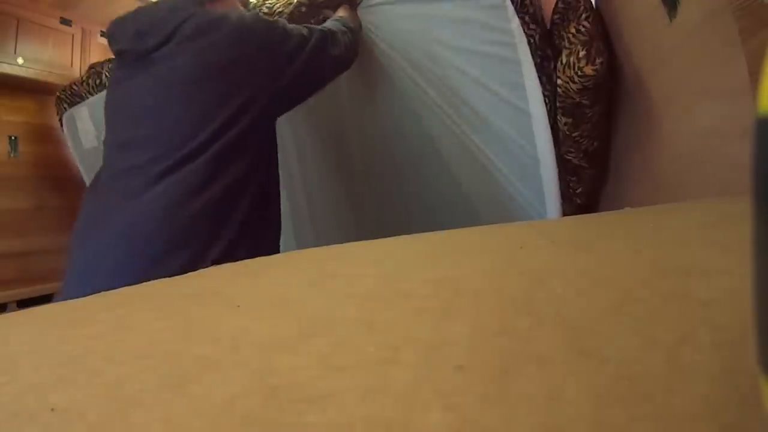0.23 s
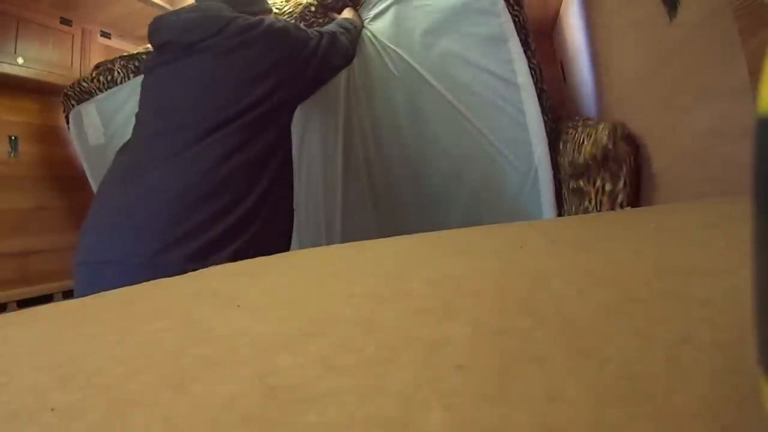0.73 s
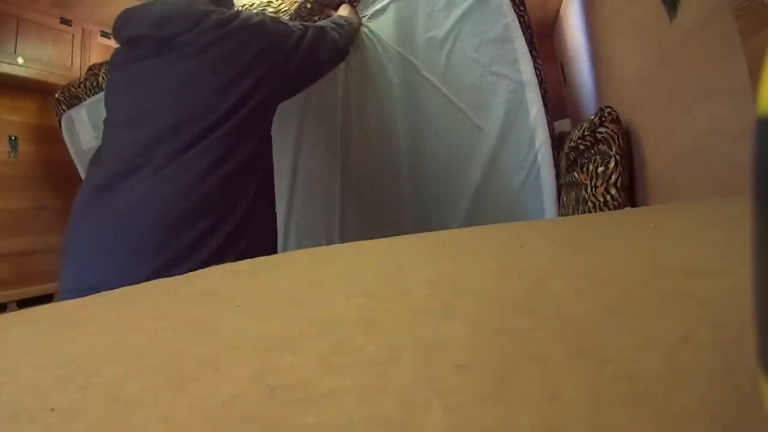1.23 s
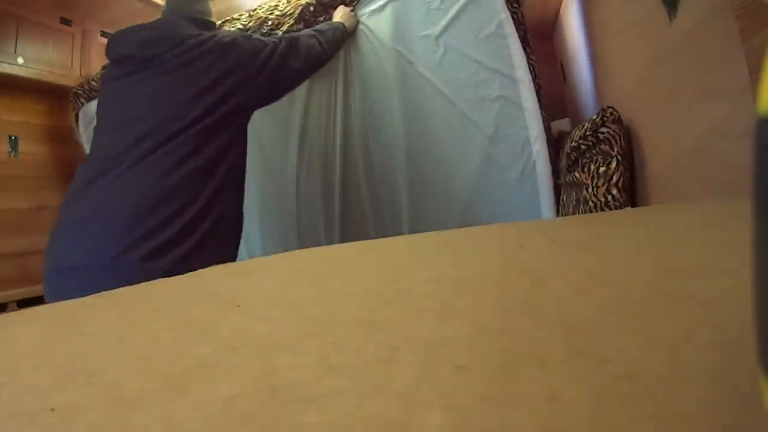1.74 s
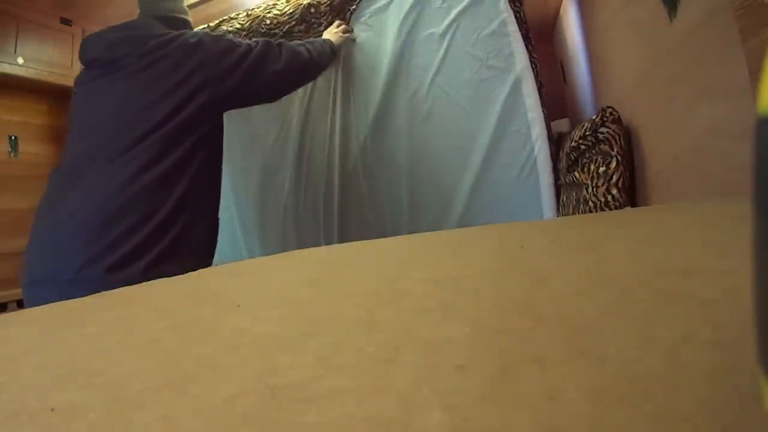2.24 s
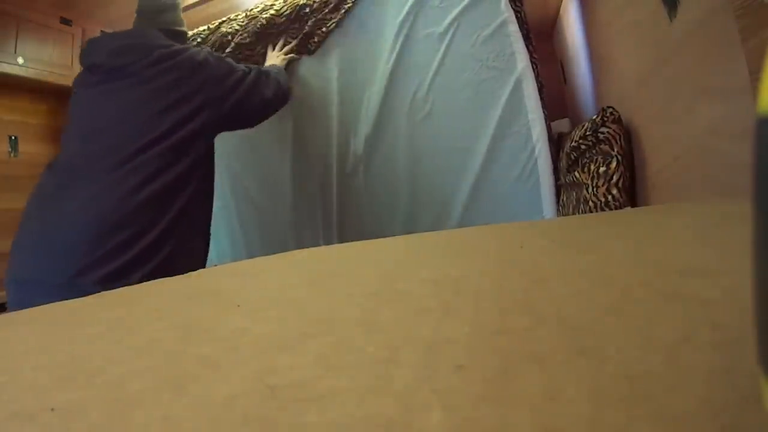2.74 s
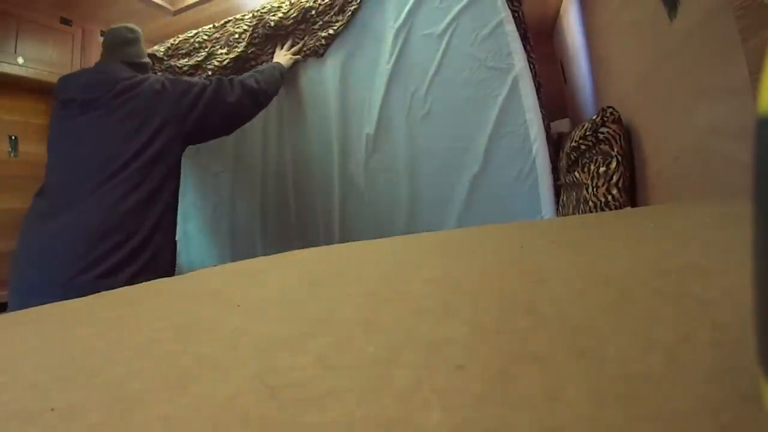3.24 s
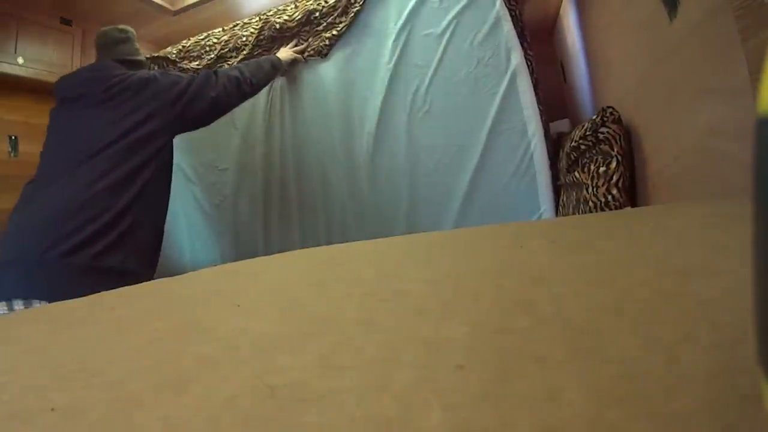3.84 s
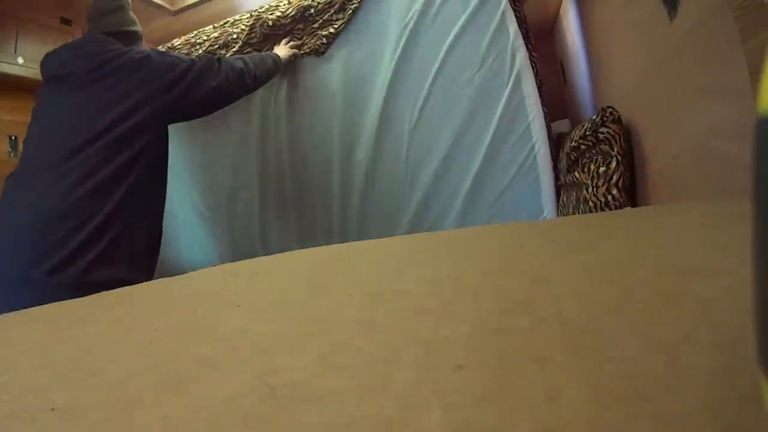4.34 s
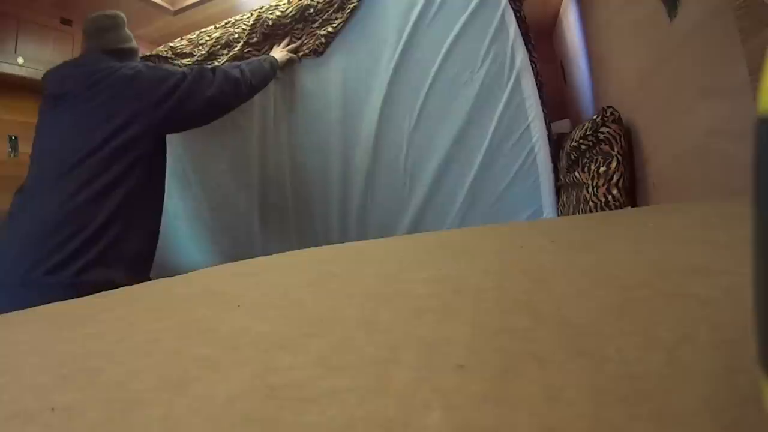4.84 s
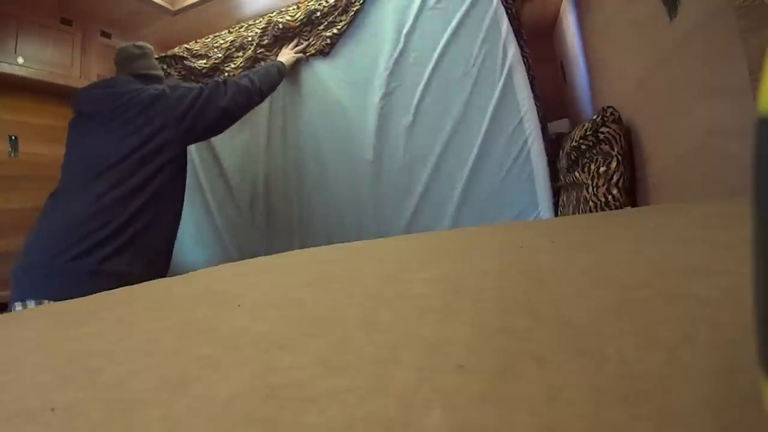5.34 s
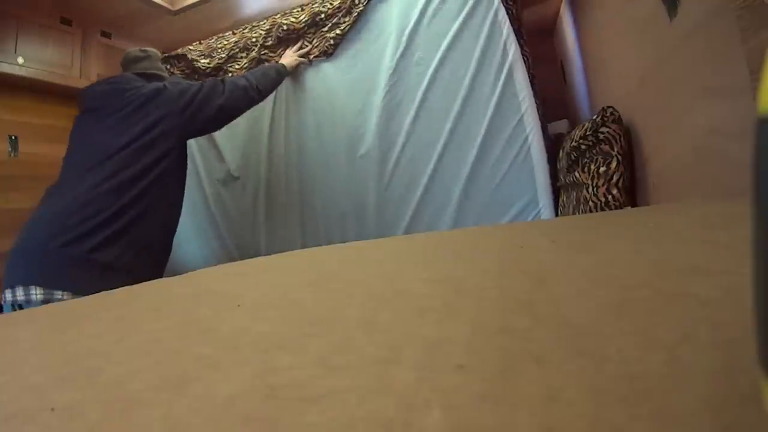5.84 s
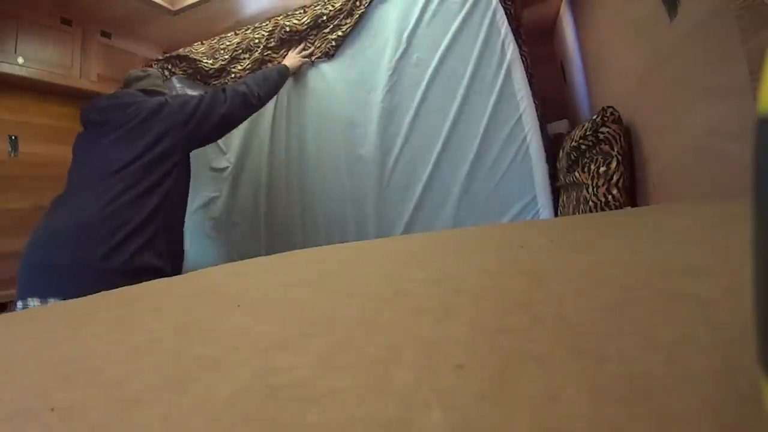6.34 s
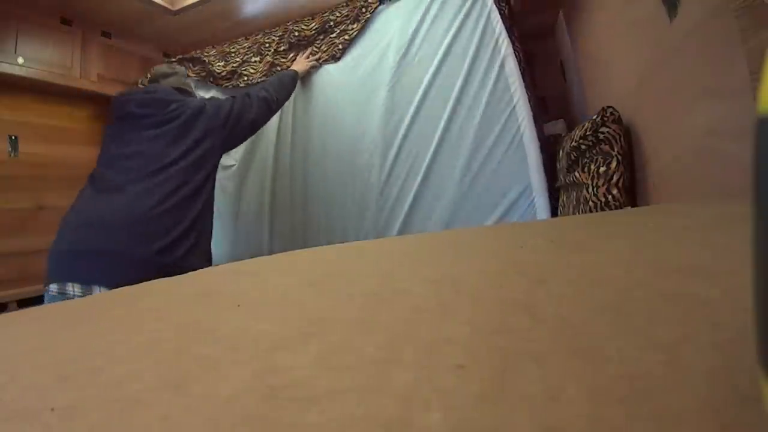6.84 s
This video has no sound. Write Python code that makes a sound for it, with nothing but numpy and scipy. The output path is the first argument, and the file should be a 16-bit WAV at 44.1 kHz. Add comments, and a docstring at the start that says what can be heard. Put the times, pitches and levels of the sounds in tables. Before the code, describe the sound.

A furnace blower rushes steadily with a low hum inside a small camper. Over it, hands and sleeves swish across a bed sheet in uneven strokes. Early on, cloth flaps and a pillow slides off with soft thuds. Quick pats come midway, then a single wooden knock, and more dull mattress thumps near the end. The microphone is close, and all sound cuts out briefly twice.

```python
"""Making a bed in a camper

A furnace blower rushes through its ducts and hums while a hand smooths a sheet, threads catching
and slipping. Cloth flaps, a pillow slides off, the mattress thuds and rumbles, and a wooden panel
knocks once. The sound, picked up by two close microphone ports, cuts out twice for about 1/8 s."""
import sys
import numpy as np
from scipy import signal
from scipy.fft import rfft, irfft, next_fast_len
from scipy.io import wavfile

SR = 44100
rng = np.random.default_rng(int(sys.argv[2]) if len(sys.argv) > 2 else 0)


def transcribe(signal):
    """Save signal, clipped to [-1, 1], as a 16-bit WAV file at the path in sys.argv[1]."""
    frames = np.atleast_2d(signal).T
    limited = np.clip(frames, -1, 1)
    pcm = np.round(limited * 32767).astype(np.int16)
    wavfile.write(sys.argv[1], SR, pcm)


N = 312228
FFT_SIZE = 2 * next_fast_len(N // 2 + 1, True)
TIME_S, FREQS_HZ = np.arange(N) / SR, np.fft.rfftfreq(FFT_SIZE, 1 / SR)


def gain_of(db):
    return 10 ** (np.asarray(db) / 20)


def unit_rms(x):
    return x / np.sqrt(np.mean(x ** 2) + 1e-20)


def per_bin(points):
    """Interpolates (freq_hz, value) rows over log frequency."""
    hz, value = np.transpose(points)
    return np.interp(np.log(FREQS_HZ + 1), np.log(hz + 1), value)


def coloured(x, spectrum_db):
    """Filters x, at rms 1."""
    return unit_rms(irfft(rfft(x, FFT_SIZE) * gain_of(spectrum_db))[:N])


def drift(cutoff_hz):
    """Slow random motion, at rms 1."""
    return coloured(rng.standard_normal(N), -20 * np.log10(1 + (FREQS_HZ / cutoff_hz) ** 4))


def movement_gain(rows, attack_s, release_s, rest_db):
    """Movements build, hold and fade over a resting level; their powers add."""
    power = gain_of(rest_db) ** 2
    for start_s, length_s, level_db in rows:
        onset = np.clip((TIME_S - start_s) / attack_s + 0.5, 0, 1)
        fade = np.exp(-np.clip((TIME_S - start_s - length_s) / release_s, 0, 20))
        power = power + (gain_of(level_db) * onset * fade) ** 2
    return np.sqrt(power)


def struck_mode(start_s, level_db, pitch_hz, t60_s, rise_s):
    """One mode builds up over the contact and dies away."""
    out = np.zeros(N)
    ringing = (TIME_S > start_s) & (TIME_S < start_s + 2 * t60_s)
    t = TIME_S[ringing] - start_s
    envelope = gain_of(level_db - 60 * t / t60_s) * (1 - np.exp(-t / rise_s))
    out[ringing] = envelope * np.sin(2 * np.pi * pitch_hz * t)
    return out


# Furnace air spectrum: freq_hz, density_db
AIR_SPECTRUM = [(15, -7.5), (30, -22.5), (60, -4.5), (110, -3), (180, -3), (330, -3), (520, -4.5),
                (750, -4), (1050, -8), (2000, -14.5), (4000, -24), (7000, -30), (11000, -32.5)]
# Duct and cabin resonances: centre_hz, width_hz, lift_db
DUCT_RESONANCES = [(170, 15, 5), (194, 20, 5), (259, 20, 5.5), (310.3, 20.5, 7.5), (402, 20, 3.5),
                   (438, 45, 5), (613, 25, 2), (657, 35, 4.5), (705, 38, 3.5), (723, 14, 7), (867, 33, 7.5),
                   (1116, 57, 3), (1296, 15, 6.5)]


def blower_rush(level_db=-24, surge_db=1.17, surge_hz=14):
    """Turbulent air, lifted at the duct resonances and surging a little."""
    lift_db = sum(db / (1 + (2 * (FREQS_HZ - hz) / width) ** 2) for hz, width, db in DUCT_RESONANCES)
    air = coloured(rng.standard_normal(N), per_bin(AIR_SPECTRUM) + lift_db)
    return air * gain_of(level_db + surge_db * drift(surge_hz))


# Fan tone as a body moves through its standing wave: time_s, relative_db
FAN_LEVELS = [(0.0, -31.5), (0.88, -32.5), (1.08, -25), (1.28, -29), (1.52, -27), (2.25, -35.5),
              (3.15, -30.5), (3.55, -30), (3.95, -29), (4.6, -32), (5.2, -32.0), (5.85, -27), (6.25, -31.5),
              (6.78, -25.5), (7.08, -33.5)]


def blower_hum(motor_hz=40.74, motor_db=-45, blades=7, fan_trim_db=-0.4, waver=0.36, waver_hz=11):
    """The motor drones at its turning rate; the blade tone wavers with the uneven airflow."""
    shaft_angle = 2 * np.pi * motor_hz * TIME_S
    motor = unit_rms(np.sin(shaft_angle))
    wavering = 1 + waver * (drift(waver_hz) + 1j * drift(waver_hz)) / np.sqrt(2)
    fan = unit_rms((wavering * np.exp(1j * blades * shaft_angle)).real)
    fan_db = fan_trim_db + np.interp(TIME_S, *np.transpose(FAN_LEVELS))
    return gain_of(motor_db) * motor + gain_of(fan_db) * fan


def friction(snags_per_s=1500, spread_db=5.5, snag_gain=0.55):
    """Threads catch and slip: dense hiss with tiny snags of uneven size."""
    snags = (rng.random(N) < snags_per_s / SR) * rng.choice([-1, 1], N)
    sizes = gain_of(spread_db * np.minimum(rng.exponential(1, N), 4))
    return rng.standard_normal(N) + snag_gain * unit_rms(snags * sizes)


# Strokes over the sheet: start_s, length_s, swish_db, fizz_db
SHEET_STROKES = [ (0.025, 0.53, -32.5, -37), (.46, 0.28, -29.5, -35.5), (.95, 0.18, -34.5, -41),
                 (1.172, 0.12, -32.5, -39), (1.352, 0.07, -32.5, -39), (1.478, 0.46, -31, -35.5),
                 (2.02, 0.24, -36.5, -42), (2.422, 0.13, -32, -39), (2.481, 0.11, -30, -36),
                 (2.732, .02, -32.5, -41), (2.847, 0.053, -41, -47), (2.954, 0.021, -36.5, -58),
                 (3.133, 0.019, -27, -35), (3.233, 0.13, -33.5, -38.5), (3.392, .28, -31.5, -36),
                 (3.827, 0.42, -37, -45), (4.185, .22, -36, -41.5), (4.458, 0.2, -36, -49),
                 (4.772, .03, -34, -45.5), (4.863, 0.19, -42.5, -46.5), (5.04, 0.17, -36, -40),
                 (5.2, 0.17, -32, -38.5), (5.517, 0.11, -36, -37.5), (5.853, 0.27, -39.5, -44.5),
                 (6.072, 0.083, -28, -34.5), (6.33, 0.4, -39, -50), (6.522, .21, -31.5, -36),
                 (6.915, 0.17, -37, -37)]
# Rubbed cloth spectrum: freq_hz, density_db
SWISH_SPECTRUM = [(150, -10.5), (500, -8.5), (1000, -2.5), (2100, 1), (3000, -4.5), (5000, -11),
                  (8000, -26), (11000, -13.5)]
# Fast sliding thread spectrum: freq_hz, density_db
FIZZ_SPECTRUM = [(1500, -31), (3500, -10), (5500, -3.5), (8000, -3.5), (11000, -5.5)]


def sheet_strokes(attack_s=0.035, release_s=0.034, swish_trim_db=1, grip_db=0.98, grip_hz=35):
    """Hand and sleeve slide over the sheet, gripping unevenly; clothes stir between strokes."""
    start_s, length_s, swish_db, fizz_db = np.transpose(SHEET_STROKES)
    swish_rows = zip(start_s, length_s, swish_db + swish_trim_db)
    fizz_rows = zip(start_s, length_s, fizz_db)
    swish = coloured(friction(), per_bin(SWISH_SPECTRUM))
    swish *= movement_gain(swish_rows, attack_s, release_s, rest_db=-51)
    fizz = coloured(friction(), per_bin(FIZZ_SPECTRUM))
    fizz *= movement_gain(fizz_rows, attack_s, release_s, rest_db=-66)
    return (swish + fizz) * gain_of(grip_db * drift(grip_hz))


# Soft blows on mattress and frame: start_s, level_db, pitch_hz, t60_s
BED_BLOWS = [(.13, -21, 55.5, .22), (.597, -13.5, 151.7, .14), (.6, -18, 82, 0.18),
             (0.712, -17, 115.8, 0.14), (.729, -22, 192.5, 0.29), (2.87, -23, 58, 0.22),
             (3.845, -18, 75, 0.11), (5.878, -15, 169, 0.2), (6.22, -15, 160.5, .15),
             (6.395, -11, 117.2, 0.15), (6.446, -13, 137, 0.13), (6.63, -23.5, 70, .25)]


def bed_thuds():
    """Each padded blow swings the bed for a few low cycles."""
    return sum(struck_mode(*blow, rise_s=0.0059) for blow in BED_BLOWS)


# Weight on the mattress: start_s, length_s, level_db
MATTRESS_LEANS = [(.54, 0.22, -26), (3.08, 0.1, -38), (3.97, 0.49, -31.5), (5.88, 1, -34.5),
                  (6.88, 0.22, -36.5)]
# Padding and frame spectrum: freq_hz, density_db
RUMBLE_SPECTRUM = [(25, -38), (60, -9), (110, -16.5), (170, 3.5), (215, -8.5), (300, -13.5), (1000, -36)]


def mattress_rumble():
    """Padding and frame turn dragging and leaning into a dull rumble."""
    weight = movement_gain(MATTRESS_LEANS, attack_s=0.12, release_s=0.12, rest_db=-40)
    return weight * coloured(rng.standard_normal(N), per_bin(RUMBLE_SPECTRUM))


# Low flaps, pillow sliding, bright rubbing hisses: peak_s, level_db, fade_s, centre_hz, width_oct
CLOTH_SWELLS = [ (.575, -19.5, .05, 750, 1.1), (.715, -19, 0.045, 475, 0.76), (1.41, -26.5, 0.036, 600, .6),
                (2.55, -30, 0.018, 4200, 0.46), (3.48, -34.5, 0.074, 4050, 0.32),
                (4.26, -40, .07, 10000, .4), (4.52, -34, 0.14, 1590, 0.094),
                (6.125, -20.5, 0.019, 840, 0.93), (6.7, -25, 0.087, 560, 0.59)]
# Quick pats and brief hisses: peak_s, level_db, centre_hz
CLOTH_TOUCHES = [(1.074, -27, 1990), (2.136, -26.5, 2500), (3.005, -35, 9000), (3.077, -18.5, 1310),
                 (3.148, -23.5, 1000), (3.206, -23.5, 850), (4.002, -43, 900), (4.467, -29, 2770),
                 (4.8, -36, 10000)]


def flaps_and_hisses(rise_per_fade=1.21, slope_db=9, knee=0.61, fft_size=2 ** 16):
    """Friction bursts: low, broad cloth flaps and pats, and brief bright hisses of rubbing on the sheet."""
    touch_rise_s, touch_fade_s, touch_oct = 0.0053, 0.015, 0.55
    swells = [(s, db, rise_per_fade * fade, fade, hz, width) for s, db, fade, hz, width in CLOTH_SWELLS]
    touches = [(s, db, touch_rise_s, touch_fade_s, hz, touch_oct) for s, db, hz in CLOTH_TOUCHES]
    freqs_hz = np.fft.rfftfreq(fft_size, 1 / SR)
    out, rubbing = np.zeros(N), friction()
    for peak_s, level_db, rise_s, fade_s, centre_hz, width_oct in swells + touches:
        near = abs(TIME_S - peak_s) < 0.5
        t = TIME_S[near] - peak_s
        off_centre = np.log2((freqs_hz + 1) / centre_hz) / width_oct
        band = gain_of(-slope_db * np.hypot(off_centre, knee))
        burst = irfft(rfft(rubbing[near], fft_size) * band)[:len(t)]
        envelope = np.exp(-np.maximum(-t / rise_s, t / fade_s))
        out[near] += gain_of(level_db) * unit_rms(burst) * envelope
    return out


# One knock and its chatter: start_s, level_db
PANEL_HITS = [(5.2703, -2), (5.2796, -8.5), (5.2888, -12.5), (5.304, -19)]
# Wooden panel modes: pitch_hz, relative_db, t60_s
PANEL_MODES = [(554, -5.5, 0.043), (657, 5, 0.035), (815, -28.5, .03), (1330, -12, 0.043),
               (2034, -16, 0.077), (2530, -25.5, .04)]


def wood_knock(rise_s=0.0013, contact_hz=1500):
    """A struck panel chatters; the blunt contact weakens its high modes."""
    return sum(struck_mode(start_s, hit_db + mode_db, hz, t60_s, rise_s) / np.hypot(1, hz / contact_hz)
               for start_s, hit_db in PANEL_HITS for hz, mode_db, t60_s in PANEL_MODES)


def cabin_reflections(x, t60_s=0.2):
    """Close walls return a short, dense spray of reflections, even in colour."""
    tail = rfft(rng.standard_normal(N) * gain_of(-60 * TIME_S / t60_s), FFT_SIZE)
    allpass = tail / (abs(tail) + 1e-12)
    return irfft(rfft(x, FFT_SIZE) * allpass)[:N]


# Likeness of the ports: freq_hz, coherence
PORT_COHERENCE = [(50, .97), (300, .95), (850, .91), (1250, .82), (1900, .6), (3000, .52), (5500, .56),
                  (8000, .73), (11000, .81)]
# Phase between ports: freq_hz, left_lead_rad
PORT_PHASE = [(40, .25), (170, .62), (270, 1.05), (480, 1.17), (800, 1.42), (1250, 1.38), (1750, 1.0),
              (2350, 0), (10000, -.12)]
# Level between ports: freq_hz, left_minus_right_db
PORT_BALANCE = [(50, .4), (200, -.4), (280, -1.6), (850, -2.8), (1400, -5.3), (2050, -6.6), (2700, -3.4),
                (5500, -1.2), (11000, -.4)]


def microphone_ports(mid, diffuse):
    """Two ports hear one sound at different phase and level; reflections make them partly unlike."""
    coherence = np.clip(per_bin(PORT_COHERENCE), 0, 1)
    lead_rad = per_bin(PORT_PHASE)
    balance = gain_of(per_bin(PORT_BALANCE))
    mid_power = balance + 1 / balance + 2 * coherence * np.cos(lead_rad)
    direct = (balance - 1 / balance + 2j * coherence * np.sin(lead_rad)) * rfft(mid, FFT_SIZE)
    reflected = 2 * np.sqrt(1 - coherence ** 2) * rfft(diffuse, FFT_SIZE)
    side = irfft((direct + reflected) / mid_power)[:N]
    return np.array([mid + side, mid - side])


def scene():
    """All sources at the two ports; a fresh draw of each noise stands for its reflections."""
    def noises():
        return blower_rush() + sheet_strokes() + flaps_and_hisses() + mattress_rumble()
    tones = blower_hum() + bed_thuds() + wood_knock()
    return microphone_ports(mid=noises() + tones, diffuse=noises() + cabin_reflections(tones))


# Silent gaps: start_s, end_s
INPUT_GAPS = [(2.6197, 2.7447), (5.3915, 5.518)]


def record(dry):
    """The tallest peaks are gently rounded off; the input cuts out twice and loses the top treble."""
    ceiling, cutoff_hz = 0.92, 11020
    rounded = dry / (1 + (dry / ceiling) ** 8) ** (1 / 8)
    live = np.ones(N)
    for start_s, end_s in INPUT_GAPS:
        live[(TIME_S > start_s) & (TIME_S < end_s)] = 0
    lowpass = signal.firwin(1023, cutoff_hz, window=("kaiser", 9), fs=SR)
    return signal.oaconvolve(rounded * live, lowpass[None], "same")


dry = scene()
out = record(dry)
transcribe(out)
```